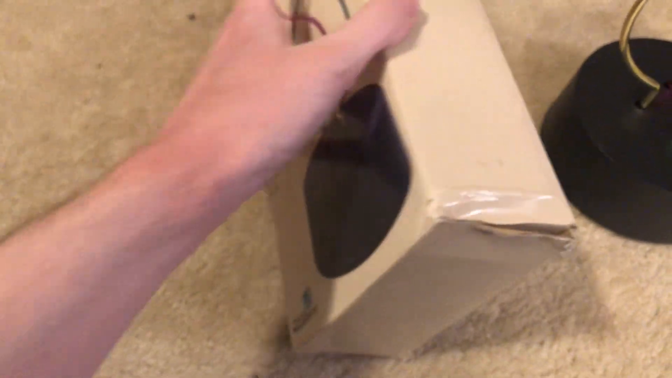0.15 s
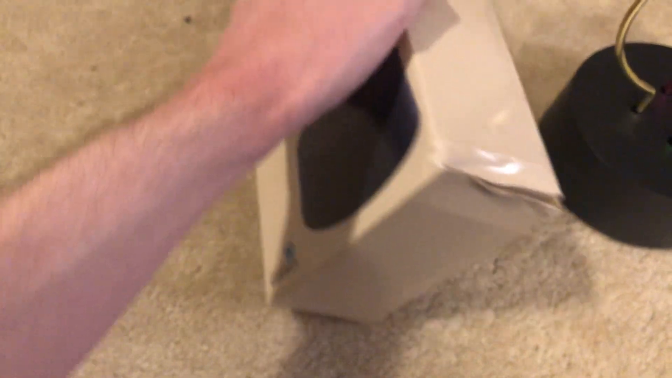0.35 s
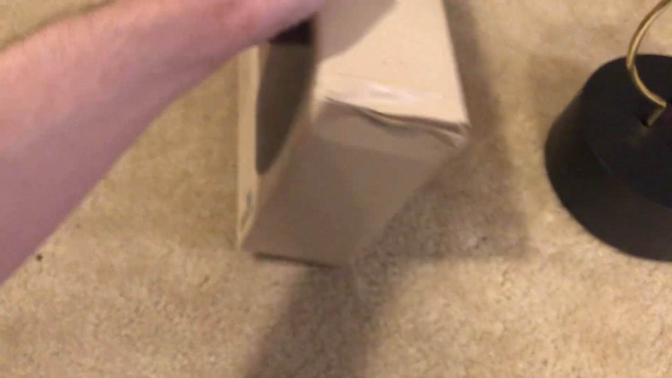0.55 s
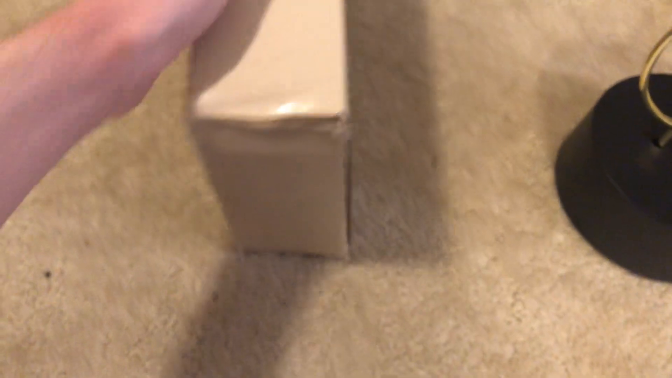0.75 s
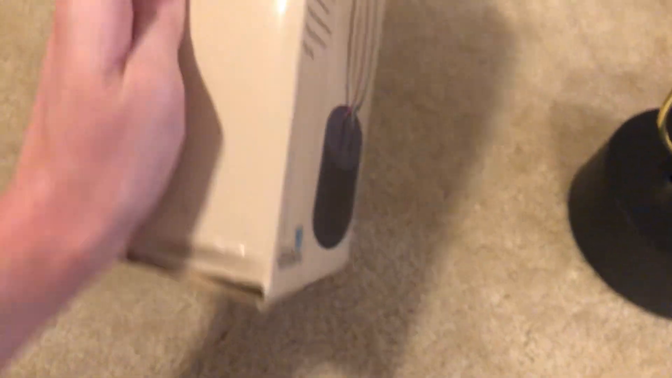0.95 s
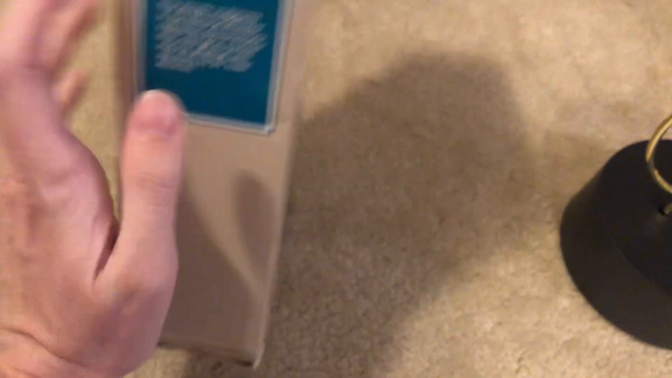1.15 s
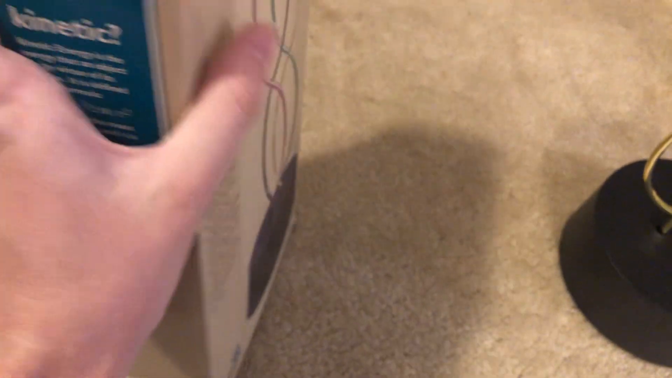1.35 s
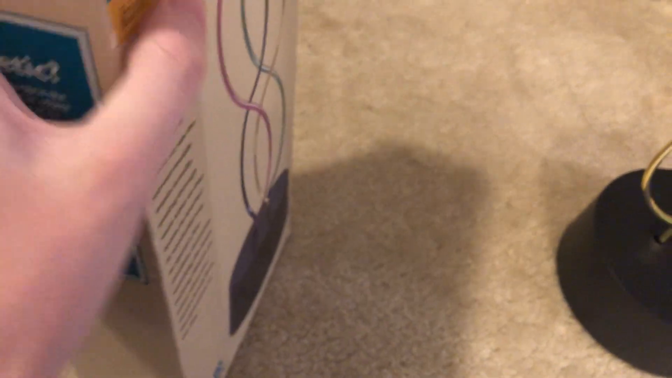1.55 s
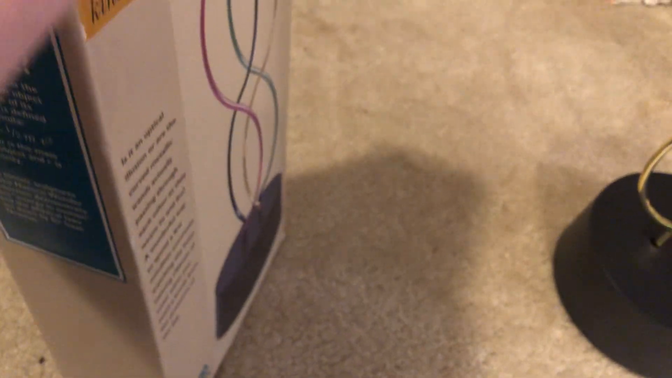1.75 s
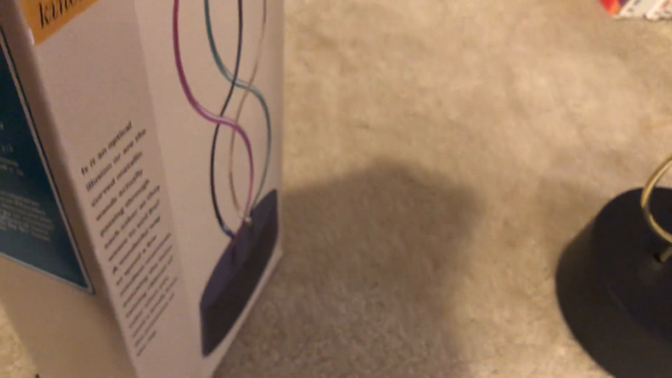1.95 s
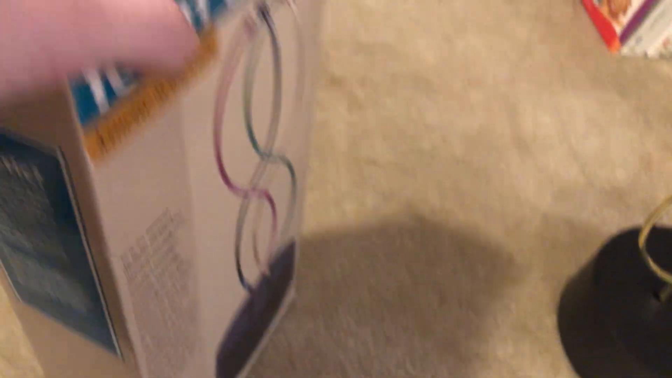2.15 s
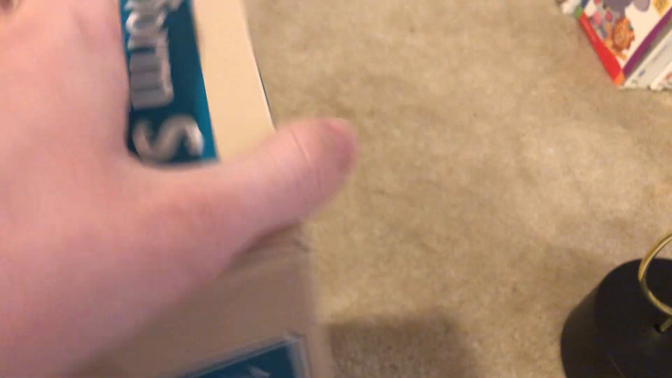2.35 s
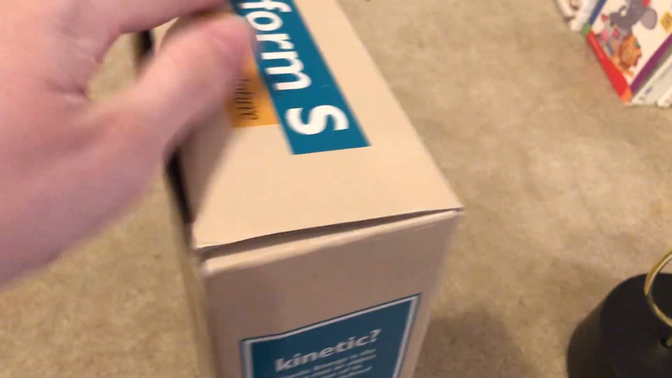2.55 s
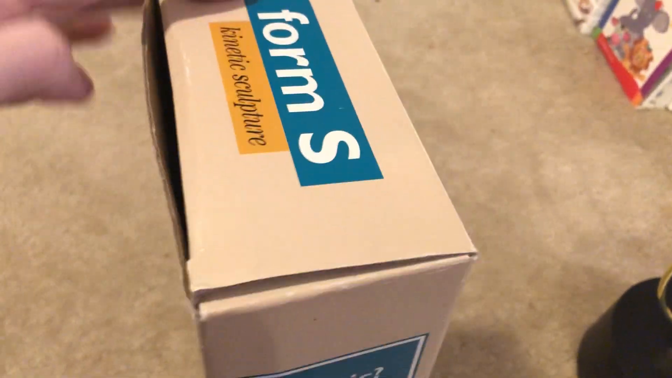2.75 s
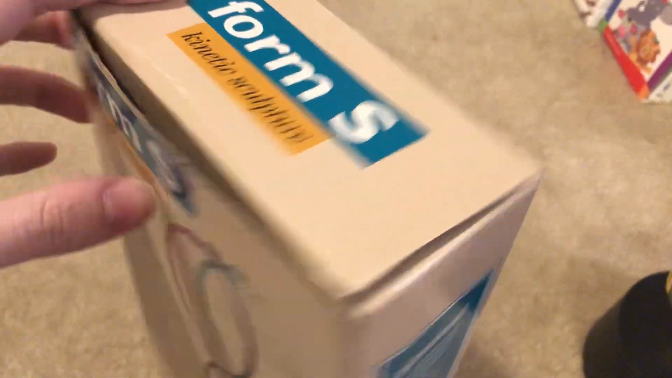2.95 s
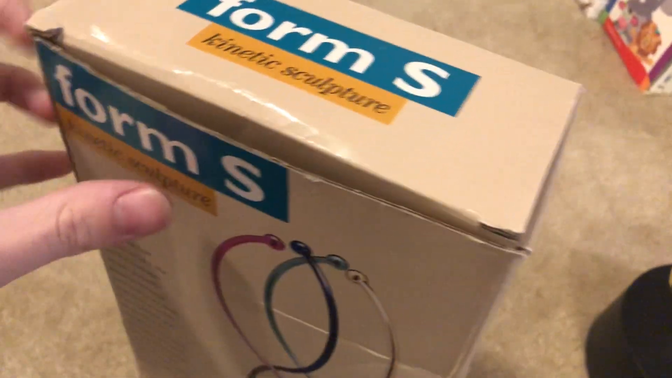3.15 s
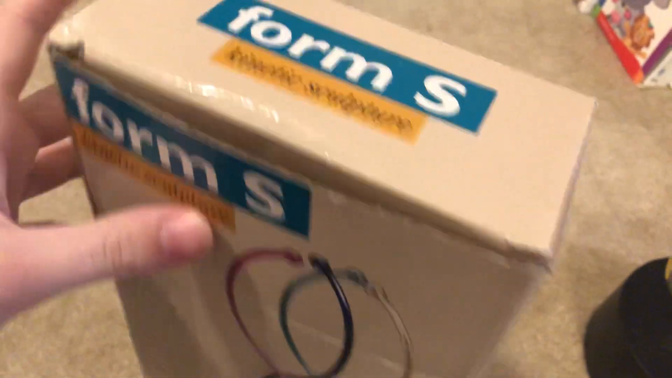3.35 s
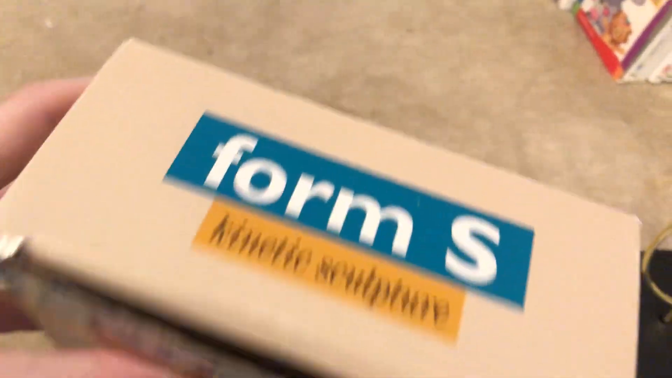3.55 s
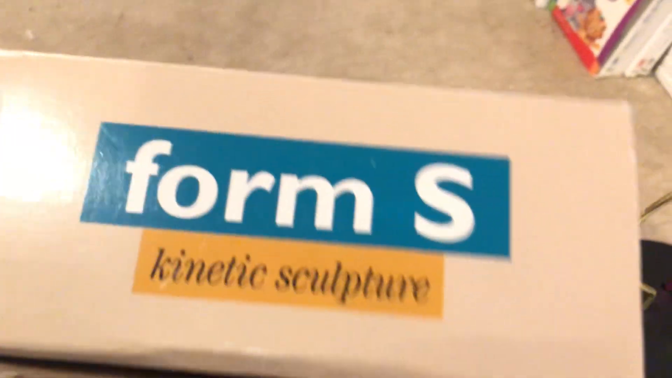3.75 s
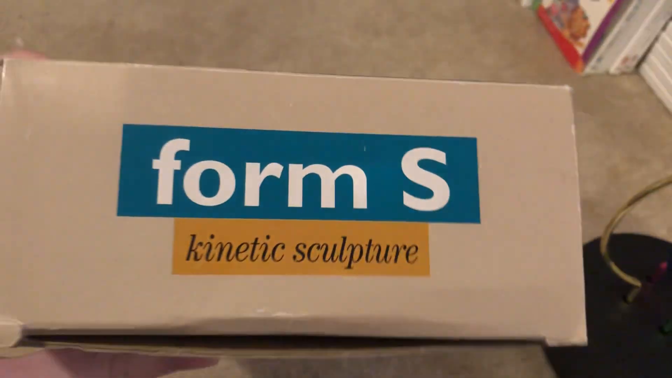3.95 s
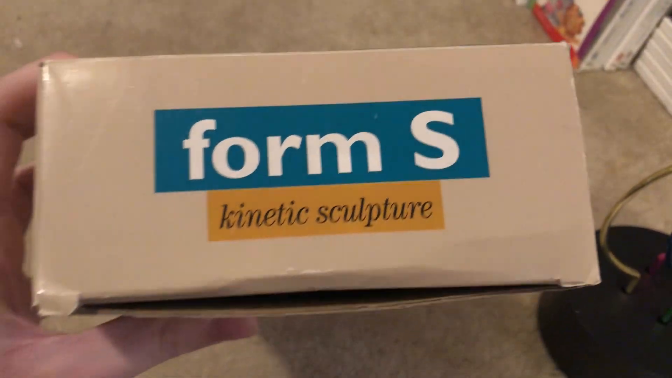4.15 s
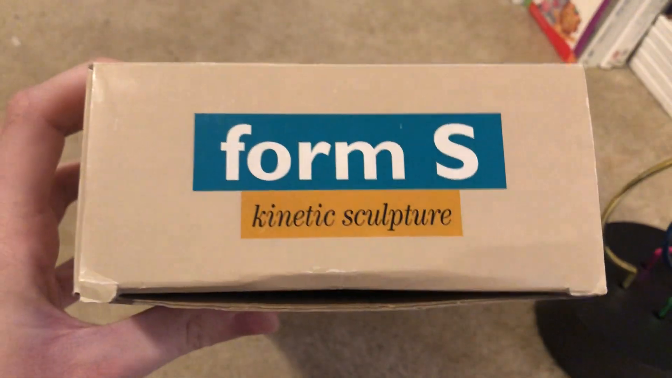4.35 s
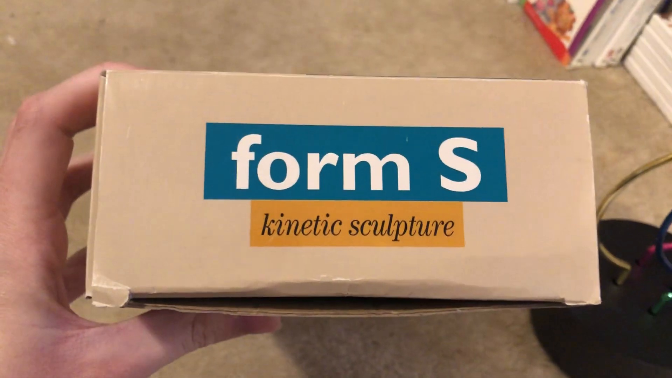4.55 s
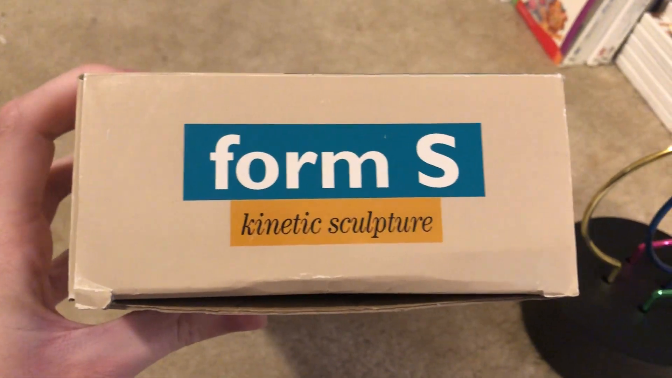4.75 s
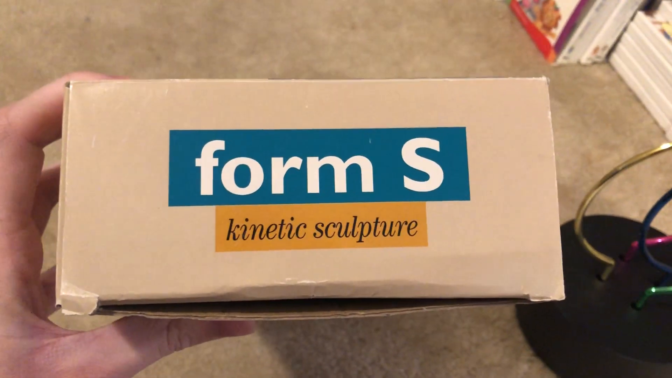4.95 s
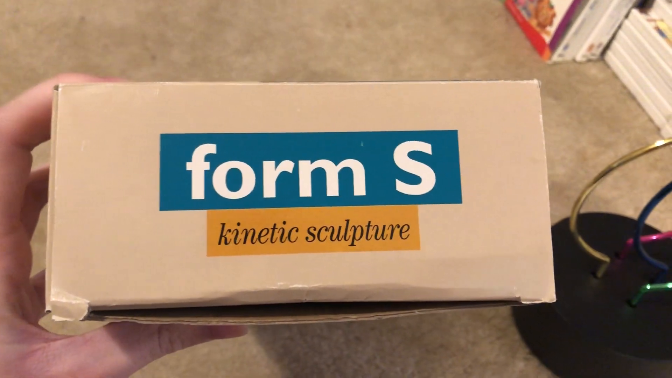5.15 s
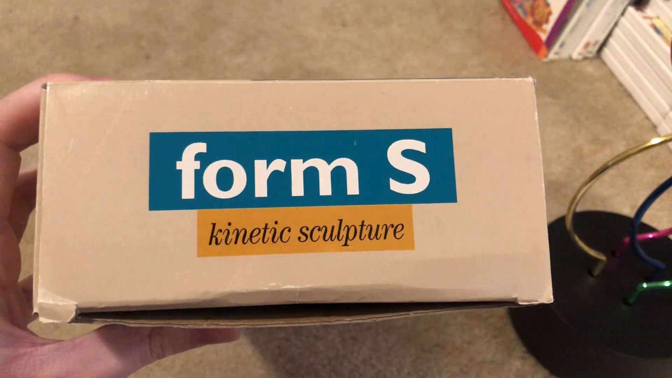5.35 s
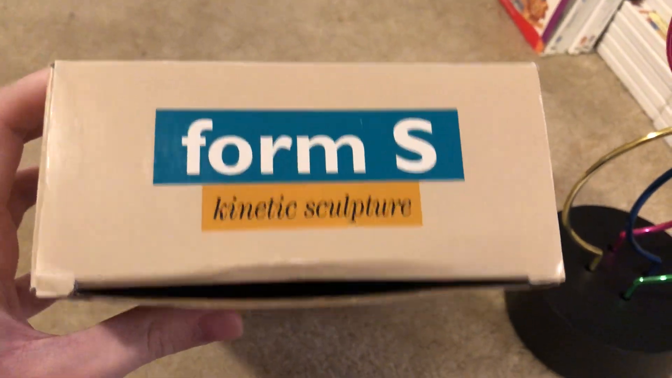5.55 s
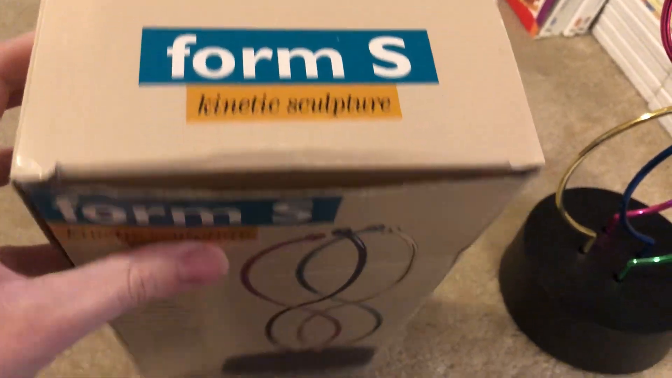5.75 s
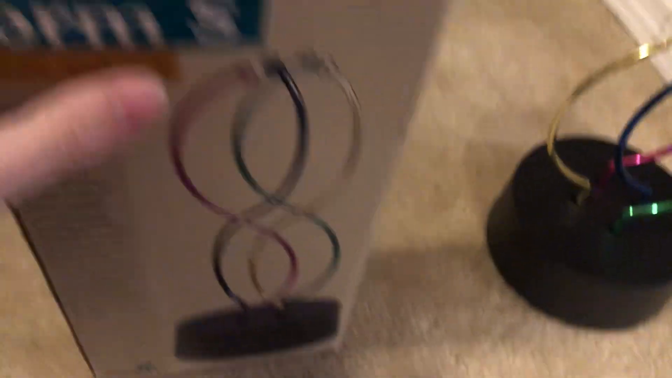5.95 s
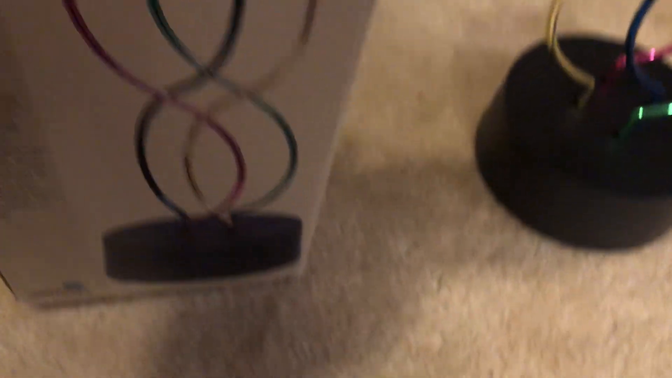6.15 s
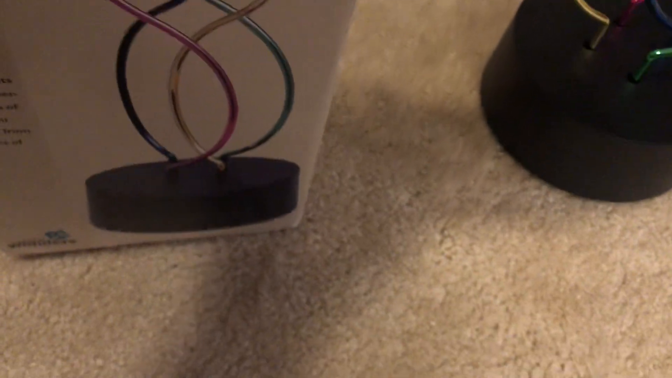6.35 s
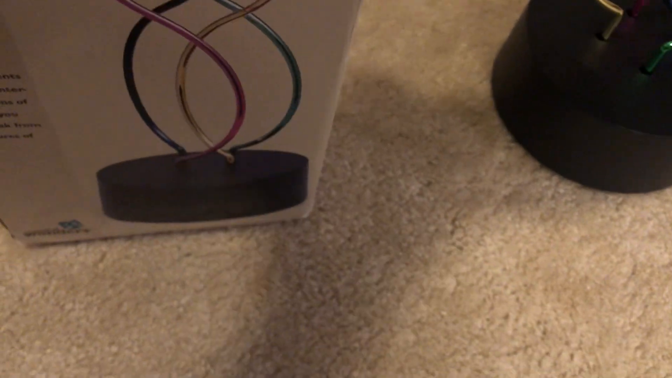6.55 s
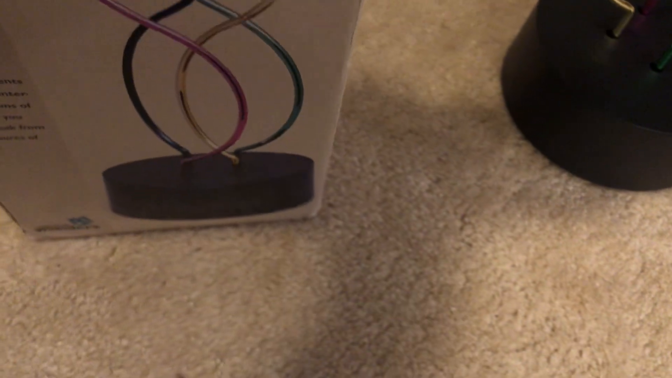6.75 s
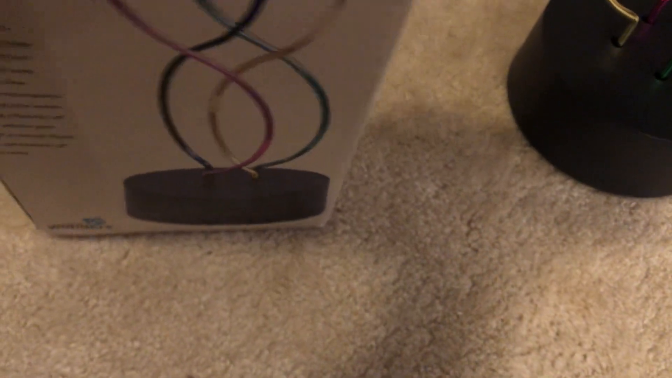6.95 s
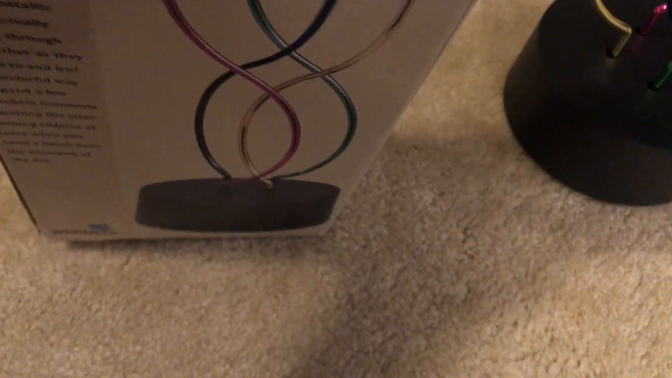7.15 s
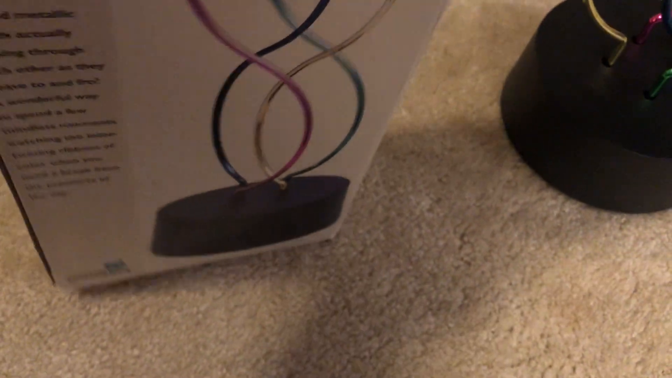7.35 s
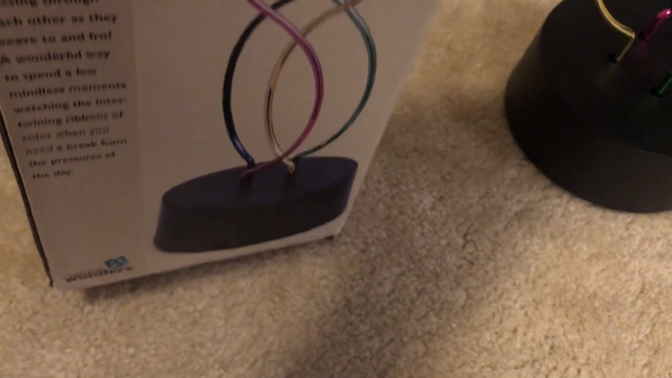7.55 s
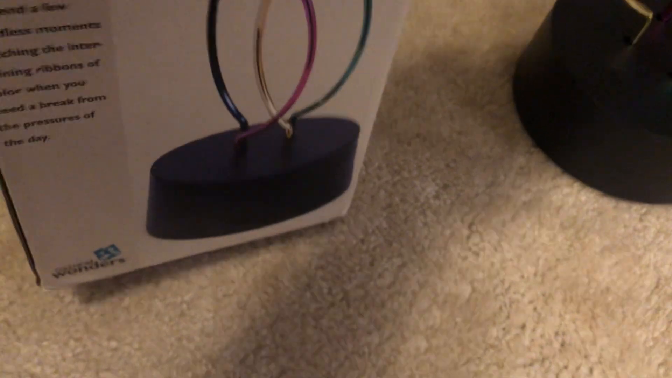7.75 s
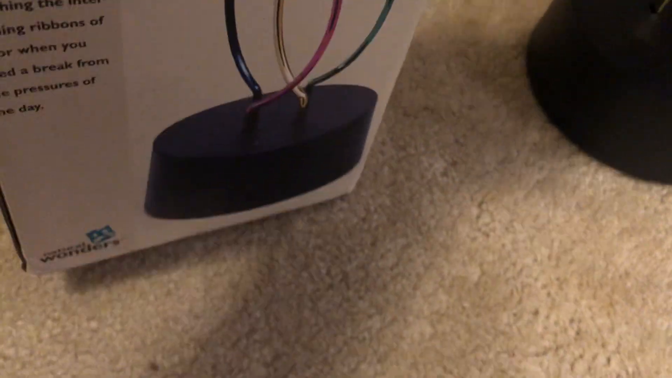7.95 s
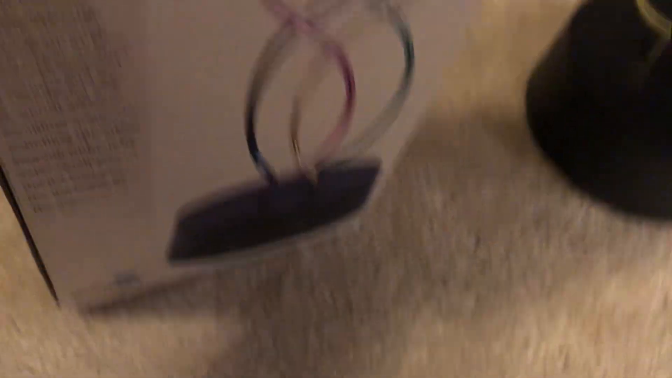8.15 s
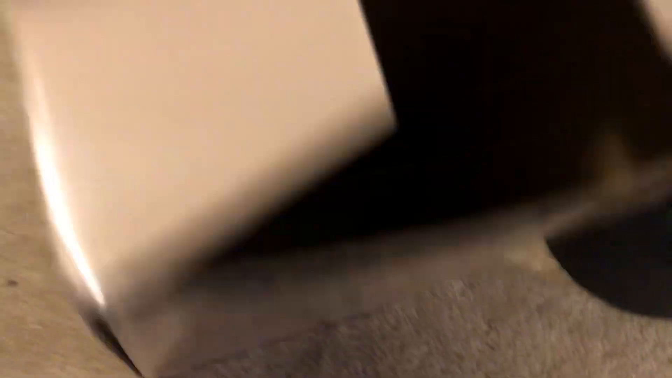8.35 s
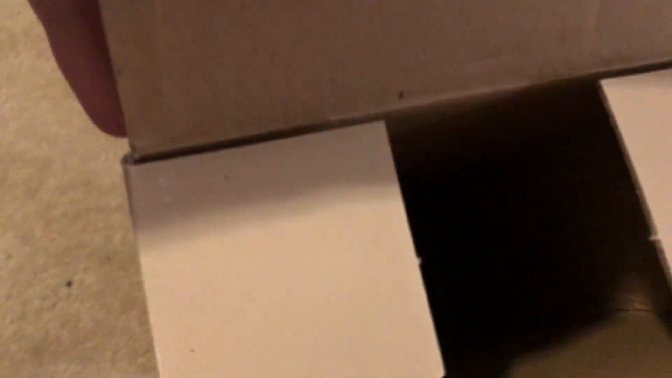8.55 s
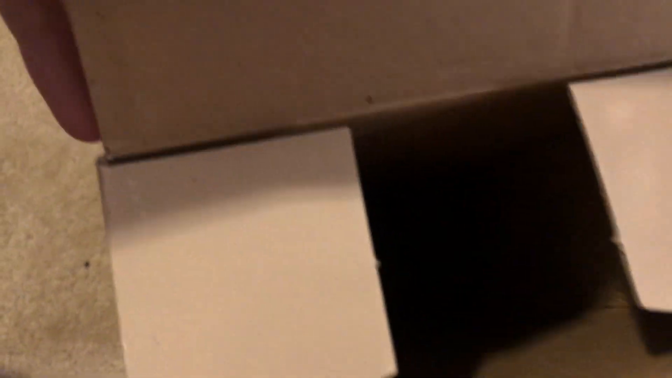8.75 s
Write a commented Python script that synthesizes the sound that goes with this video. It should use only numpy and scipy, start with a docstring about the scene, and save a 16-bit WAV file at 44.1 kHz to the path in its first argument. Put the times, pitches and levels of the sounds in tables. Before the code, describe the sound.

An empty cardboard carton is handled close to a phone in a quiet carpeted room. Soft rasping slides lead into a cluster of hollow bumps and papery ticks, then scattered scrapes and knocks. A pause leaves only low ventilation hum and faint hiss. Rubbing resumes, building to one loud, sharp cardboard clack, then fading into light scrapes.

```python
"""Cardboard box dragged over carpet

An empty box is tipped, turned and slid by hand, close to a phone in a quiet room.
Flicks of random noise make the rasp of skin and carpet fibres, and shake panel resonances into a rumble.
Decaying sines make the knocks, short noise bursts the cracks, narrow filtered noise the rings.
A short room tail follows the box; shaped noise lies under it as ventilation hum and hiss."""
import sys
import numpy as np
from scipy import signal
from scipy.fft import rfft, irfft
from scipy.io import wavfile
from scipy.ndimage import uniform_filter1d

SR = 44100
rng = np.random.default_rng(int(sys.argv[2]) if len(sys.argv) > 2 else 0)


def digitize_waveform(pressure):
    """Quantize a signal to 16-bit integers and store it at the path in sys.argv[1].

    Rows of a 2-D input are taken as channels; values are limited to [-1, 1].
    """
    field = np.atleast_2d(pressure).T
    bounded = np.clip(field, -1, 1)
    quanta = np.round(bounded * 32767).astype(np.int16)
    wavfile.write(sys.argv[1], SR, quanta)


N = 392049  # length in samples

# Colour of the fine sizzle. Each row: frequency in Hz, relative density in dB per Hz.
SIZZLE_COLOUR = [(7000, -21), (10000, -12.5), (13000, -4.5), (16000, -3.5)]


def rubbing():
    """Fibre flicks radiate directly as rasp and sizzle, and through the panels as rumble."""
    rasp_level, sizzle_level, panel_level = friction()
    sizzle_flicks = fibres(per_s=3000, spread_db=3.0, patchy_db=1.4)
    sizzle = colour(sizzle_flicks, SIZZLE_COLOUR, 10000, 17600)
    direct = rasp_level * rasp(spread_db=2.5) + sizzle_level * sizzle
    return direct + undb(-2.5) * panel_level * rumble()


# Faint rubbing while the hand is on the moving box. Each row: time in seconds, rasp level in dB.
HOLDING = [(0, -82.5), (0.8, -77), (1.1, -77.5), (2.4, -81), (3.2, -85), (3.3, -77), (3.63, -79),
           (4.0, -96), (5.75, -102), (5.9, -77), (6.4, -89), (7.5, -85), (8.5, -78), (8.89, -80)]
HOLDING_SIZZLE_DB, HOLDING_PANEL_DB = -2.5, 9  # drive relative to its rasp
# Slides over carpet and skin. Each row: start in seconds, attack, hold and release in ms, rasp level in dB,
# drift over the hold in dB, then sizzle and panel drive in dB relative to the rasp.
SLIDES = [(0.08, 223, 270, 160, -61.5, -2, -0.5, 10), (0.85, 59, 26, 35, -62, 1, -9, 7.5),
          (1.12, 79, 4, 25, -60.5, -5, -3, 12.5), (1.27, 50, 28, 40, -63.5, -2.5, 2, 15),
          (1.34, 30, 75, 30, -75, 1, -1, 14), (1.43, 40, 52, 40, -68, -1, 4, 0),
          (1.47, 96, 47, 33, -65, -4, 10.5, -2), (1.62, 25, 104, 110, -66.5, -2, 3, 10.5),
          (1.76, 40, 50, 30, -75, -2, -4, 16), (1.88, 19, 74, 320, -70, -6, -1, 16),
          (2.08, 37, 130, 34, -74, 1, -3, 10.5), (2.23, 36, 178, 37, -66.5, -3, -3, 10.5),
          (2.49, 94, 123, 17, -80, 7, 7, 18), (2.56, 160, 4, 52, -73, -1, -4, 3),
          (2.7, 200, 20, 12, -72, 1, -8, 17.5), (2.875, 72, 140, 70, -61, -1, 1, 10),
          (3.335, 27, 220, 70, -69.5, -3, 1, 2), (5.79, 60, 234, 60, -74, -6, -3, 10.5),
          (6.07, 45, 4, 72, -71, -6, 2.5, 7), (6.195, 14.4, 26.5, 15, -66, 5, -3, 9),
          (6.36, 40, 4, 34, -69, -1, -6, -3), (6.41, 98, 266, 100, -69, 0, -3, 11),
          (6.79, 44, 83, 33, -73, 5, -2, 8.5), (6.93, 63, 3.3, 30, -55.5, -1.5, -3, 12.5),
          (7.04, 43, 3, 27, -57.5, 0, 1, 8), (7.06, 240, 10, 150, -67.5, -1, 2, 15.5),
          (7.31, 42, 46, 86, -68.5, 4.5, 0, 16.5), (7.42, 190, 56, 50, -65.5, -3, 1, 14),
          (7.66, 39, 5, 20, -67, 0, 0, 18), (7.772, 3, 12, 90, -59, -5, -4, 17),
          (7.86, 73, 80, 50, -76, -10, 2, 12), (7.96, 201, 40, 140, -67.5, -3, 1, 15),
          (8.2, 86, 120, 60, -65, -4.5, 2, 6), (8.73, 84, 3, 23, -57.5, -4, 0, 1.5),
          (8.83, 60, 10, 10, -68, -1, -6, -6)]
EDGE_DB = -20  # how far under its level a slide starts and ends
# Short slips of a finger or an edge. Each row: start in seconds, rasp level in dB (the peak is 3 dB above),
# length in ms, share of the length to the peak, then sizzle and panel drive in dB relative to the rasp.
SLIPS = [(0.664, -67, 41, 0.88, -6.5, 10), (1.1, -75, 20, 0.7, -8, 10), (1.152, -62.5, 36, 0.35, -2, 9),
         (1.19, -62, 15, 0.47, -6, 16), (1.238, -72.5, 25, 0.49, -2, 20), (1.29, -73, 14, 0.2, 0, 10),
         (1.312, -65, 35, 0.15, 5, 14), (1.46, -75, 64, 0.23, 3, 0), (1.637, -65, 28, 0.27, -1, 11.5),
         (1.725, -62.5, 22, 0.6, -2, 5), (1.79, -83.5, 16, 0.29, -12, 12),
         (1.819, -76.5, 54, 0.58, 3, 17.5), (1.889, -74, 36, 0.3, -6, 9), (1.93, -69, 16, 0.4, -8, 6),
         (2.252, -69, 29, 0.53, -5.0, 11), (2.381, -62.5, 29, 0.12, -6, 8.5),
         (2.527, -64.5, 31, 0.46, -3, 7.5), (2.646, -61, 10, 0.2, 5, 1), (2.666, -58.5, 24, 0.64, 7, 14),
         (3.022, -61.5, 32, 0.5, 0, 13), (3.353, -66, 27, 0.21, -6, 15.5), (3.402, -65, 31, 0.38, 0.5, 5),
         (3.522, -65, 20, 0.5, 3, 13), (3.577, -65, 40, 0.2, -8, 4), (3.899, -72, 19, 0.98, -6.0, -2),
         (5.612, -72.5, 16, 0.71, -1, 9), (5.824, -67, 39, 0.33, 2, 1), (5.908, -64.5, 36, 0.19, -8, 4),
         (6.03, -74, 25, 0.4, 1, 4), (6.093, -70.5, 44, 0.66, -1, 13), (6.39, -73.5, 40, 0.36, -5, 11.5),
         (6.531, -79, 30, 0.32, 7, 3), (6.716, -67, 15, 0.35, -3, 12.5), (6.736, -66.5, 13, 0.54, 12.5, 13),
         (6.799, -62, 13, 0.55, -20, 7), (6.974, -60, 74, 0.22, -1, 8),
         (7.043, -67.5, 16, 0.47, -5.0, 14.5), (7.065, -64.5, 55, 0.65, -5, 16.5),
         (7.222, -71.5, 28, 0.23, -9, 17.5), (7.334, -63, 93, 0.21, 4, 14.5),
         (7.384, -65, 63, 0.12, 4.5, 17.5), (7.567, -63.5, 48, 0.15, -2, 12),
         (7.627, -64.5, 59, 0.26, -4, 17.5), (7.708, -54, 25, 0.64, 0, 10.5),
         (7.722, -45.5, 26, 0.5, -1, 10.5), (7.737, -43.5, 27.4, 0.53, -1, 7.5),
         (7.76, -49, 24, 0.6, 5, 10), (7.781, -57.5, 13, 0.36, -15, 23.5), (7.803, -72, 9.8, 0.65, -9.0, 8),
         (7.864, -74, 37, 0.35, -11, 25.5), (8.252, -71, 6.3, 0.47, -21, 26.5), (8.3, -73, 23, 0.5, 4, 4),
         (8.485, -77.5, 34, 0.4, 2, 4), (8.695, -79, 30, 0.5, -1, -4), (8.775, -77, 58, 0.7, -7, -5),
         (8.865, -71, 19, 0.4, -1, 4)]


def friction():
    """Strength in time of rasp, sizzle and panel drive, summed in power over holding, slides and slips."""
    def layer_power(rasp_db, sizzle_db, panel_db):
        return undb(2 * (rasp_db + np.array([[0], [sizzle_db], [panel_db]])))

    t = np.arange(N) / SR
    holding_db = np.interp(t, *np.transpose(HOLDING))
    power = layer_power(holding_db, HOLDING_SIZZLE_DB, HOLDING_PANEL_DB)

    for start, attack_ms, hold_ms, release_ms, db, drift_db, sizzle_db, panel_db in SLIDES:
        corners = start + np.cumsum([0, attack_ms, hold_ms, release_ms]) / 1000
        on = slice(int(start * SR), int(corners[-1] * SR))
        contour_db = np.interp(t[on], corners, [EDGE_DB, 0, drift_db, drift_db + EDGE_DB])
        power[:, on] += layer_power(db + contour_db, sizzle_db, panel_db)
    power = uniform_filter1d(power, size=441)  # 10 ms of smoothing

    for start, db, ms, rise, sizzle_db, panel_db in SLIPS:
        u = np.linspace(0, 1, int(ms * SR / 1000))
        rise = np.clip(rise, .05, .95)
        # the grip builds up to the peak and dies away after it
        shape = np.sin(np.pi / 2 * np.minimum(u / rise, (1 - u) / (1 - rise))) ** 2
        stretch = power[:, int(start * SR):int(start * SR) + len(u)]
        stretch += 2 * layer_power(db, sizzle_db, panel_db) * shape[:stretch.shape[1]]
    return np.sqrt(np.maximum(power, 0))


# Ridges that catch: mean rate per second, mean jump in gain, fade time constant in ms.
CATCH_PER_S, CATCH_GAIN, CATCH_MS = 45, 0.42, 5.8


def fibres(per_s, spread_db, patchy_db):
    """Fibres that catch and let go: dense flicks of uneven size over a hiss, the grip wavering."""
    struck = rng.random(N) < per_s / SR
    size = undb(spread_db * np.minimum(rng.exponential(size=N), 4.0))
    flicks = struck * size * rng.standard_normal(N)
    # now and then a ridge catches: the level jumps at once and fades
    catches = (rng.random(N) < CATCH_PER_S / SR) * rng.exponential(size=N) * CATCH_GAIN
    grip = 1 + signal.lfilter([1], [1, -np.exp(-1000 / CATCH_MS / SR)], catches)
    contact = flicks / flicks.std() + 1.09 * rng.standard_normal(N)
    return contact * undb(patchy_db * walk(70)) * grip / np.sqrt(np.mean(grip ** 2))


# High resonances of the corrugated card. Each row: frequency in Hz, width in Hz, relative level in dB.
CARD_RESONANCES = [(2300, 1500, 8.5), (3060, 1000, -4), (3750, 900, 2.5), (4520, 1000, 1),
                   (5180, 690, -1.5), (5960, 1600, 0.5), (6800, 870, -8.5), (2150, 180, -12),
                   (3150, 120, -7.5), (4420, 200, -7), (5730, 250, -9.5), (7560, 1400, -6),
                   (8900, 1000, -4.5), (11600, 2100, -13)]


def rasp(spread_db):
    """Flicks ring the card's high resonances, which come and go as the contact moves."""
    flicks = fibres(per_s=4900, spread_db=2.0, patchy_db=1.5)
    out = undb(-19) * flicks
    for hz, width_hz, db in CARD_RESONANCES:
        band = signal.lfilter(*signal.iirpeak(hz, hz / width_hz, fs=SR), flicks)
        gain = undb(db + spread_db * walk(18))
        out = out + gain * band / band.std() * flicks.std() / 4
    return colour(out, [(600, -24), (1700, 0), (11000, 0), (16000, -8)], 2500, 9000)


# Panel and cavity modes of the box, also rung by the knocks. Each row: frequency in Hz, relative level in dB,
# 60 dB decay in seconds before damping or grip.
BOX_MODES = [(67.4, -9, 0.15), (97.3, -3, 0.3), (140, 7, 0.076), (220.6, 4.5, 0.086), (302, 2, 0.056),
             (366, -1.5, 0.029), (490, -3, 0.066), (563.5, -2.5, 0.055), (690, 2.5, 0.035),
             (809.5, -1.5, 0.043), (898, 0, 0.028), (990, -5, 0.03), (1133, 2.5, 0.013), (1273, 4.5, 0.033),
             (1400, 4, 0.032), (1660, -3, 0.037), (2146, -6, 0.036)]
# The panel that faces the phone changes as the box turns.
# Each row: time in seconds, loudest rumble in octaves above 100 Hz.
FACING = [(0, 1.1), (0.7, 2), (1.2, 1.6), (1.7, 2.3), (2, 2), (2.68, 2.17), (3.5, 2.23), (5.9, 3.2),
          (6.5, 2.35), (7.0, 2.3), (7.6, 2.35), (7.75, 2.56), (7.88, 2.3), (8.3, 2.26), (8.65, 1.6),
          (8.8, 2.6)]
# Papery skirt of dense, weak modes. Each row: frequency in Hz, relative density in dB per Hz.
SKIRT_COLOUR = [(300, -20), (1200, 1), (2200, -5.5), (4000, -12.5), (8000, -28)]
SKIRT_DB = -14  # relative to the summed modes
GRIP_DAMPING, BEND = 1.73, 0.03  # rubbed modes ring shorter and their pitch wanders by this share
RUB_TILT_DB = -5.5  # per octave above 900 Hz: rubbing drives the top panel modes less
MUFFLE_DB = 4.5  # spread of a rubbed mode's level


def rumble():
    """Fibre flicks shake the panel modes; those near the facing panel's pitch come out loudest."""
    force = fibres(per_s=1500, spread_db=2.0, patchy_db=2.5)
    facing = np.interp(np.arange(N) / SR, *np.transpose(FACING))
    out, power = 0, 0
    for hz, db, t60 in BOX_MODES:
        q = np.pi * hz * t60 / GRIP_DAMPING / np.log(1000)
        mode = signal.lfilter(*signal.iirpeak(hz, q, fs=SR), force)
        # reading at an uneven pace bends the pitch
        mode = np.interp(np.cumsum(1 + BEND * walk(9)), np.arange(N), mode)
        # the hand's grip shifts, so each mode is freer or more muffled from moment to moment
        tilt_db = RUB_TILT_DB * max(np.log2(hz / 900), 0)
        gain = undb(db + tilt_db + MUFFLE_DB * walk(24))
        gain = gain * (focus(np.log2(hz / 100), facing, 1.0) + 0.3)
        out = out + gain * mode / mode.std()
        power = power + gain ** 2
    return out / np.sqrt(power) + undb(SKIRT_DB) * colour(force, SKIRT_COLOUR)


def focus(octave, centre, spread):
    """Gain of a mode that lies some octaves from the favoured pitch."""
    return np.exp(-.5 * ((octave - centre) / spread) ** 2)


# Knocks on the panels and low thuds on the carpet. Each row: start in seconds, peak in dB, favoured pitch in
# Hz, spread of modes in octaves, decay speed of the modes (1 keeps their own decay time).
KNOCKS = [(1.118, -40.5, 341, 0.45, 1.36), (1.167, -46.5, 470, 0.15, 0.63), (1.198, -33, 430, 0.72, 0.89),
          (1.292, -47, 240, 0.45, 0.65), (1.295, -47, 950, 0.16, 1.1), (1.312, -40, 300, 0.5, 1.2),
          (1.326, -30.5, 378, 0.68, 1.06), (1.341, -34.5, 282, 0.47, 1.1), (1.35, -43, 140, 0.35, 0.8),
          (1.418, -39, 700, 0.42, 0.94), (1.422, -34.5, 189, 0.49, 1.06), (1.66, -39.5, 303, 0.6, 1),
          (1.738, -41.5, 1400, 0.45, 1.15), (1.739, -43, 302, 0.44, 1.2), (1.751, -46.5, 230, 0.37, 0.49),
          (1.796, -46, 700, 0.41, 0.83), (1.919, -45, 248, 0.88, 1.1), (2.014, -45.5, 250, 0.59, 1.7),
          (2.262, -44.5, 564, 1.2, 0.77), (2.416, -42, 354, 1, 1.1), (2.548, -44, 240, 0.7, 0.92),
          (2.647, -44.5, 535, 0.28, 0.94), (2.669, -34.5, 525, 0.35, 0.81), (2.677, -35, 536, 0.34, 1.4),
          (2.878, -28.5, 406, 0.67, 1.02), (3.025, -47, 300, 0.46, 1), (3.036, -40, 875, 0.31, 0.74),
          (3.064, -43.5, 641, 0.25, 0.65), (3.358, -47, 366, 0.84, 0.58), (3.53, -45, 400, 0.98, 1),
          (3.536, -35, 247, 1.2, 1.04), (5.616, -64, 342, 0.7, 1.1), (5.912, -49.5, 317, 1.2, 0.6),
          (6.23, -52, 239, 0.94, 0.77), (6.395, -54, 342, 0.38, 0.58), (6.804, -54, 2190, 0.25, 1.14),
          (6.846, -45, 270, 1.1, 1.6), (6.848, -46.5, 940, 0.29, 0.73), (6.993, -38, 840, 1.1, 1.6),
          (7.078, -37.5, 1430, 0.36, 1.14), (7.094, -47, 685, 0.78, 0.85), (7.224, -43.5, 212, 0.38, 0.72),
          (7.239, -52, 690, 0.27, 0.99), (7.34, -42, 1320, 0.29, 0.92), (7.386, -38, 378, 0.68, 0.87),
          (7.391, -44, 80.4, 0.42, 1.3), (7.574, -43.5, 820, 0.43, 0.59), (7.634, -57, 408, 0.65, 1.1),
          (7.716, -46, 800, 0.6, 0.75), (7.731, -23.5, 650, 0.4, 1.6), (7.732, -34, 129, 0.39, 1.2),
          (7.738, -30, 920, 0.13, 0.72), (7.753, -26.5, 2200, 0.2, 1.25), (7.761, -28, 713, 0.44, 0.61),
          (7.771, -21.5, 863, 0.37, 0.9), (7.774, -30.5, 311, 0.23, 0.76), (7.777, -32, 56, 0.33, 2.1),
          (7.785, -32, 1960, 0.25, 1.5), (7.787, -33, 855, 0.22, 1.1), (7.795, -31.5, 102.6, 0.9, 0.99),
          (7.807, -36.5, 241, 0.65, 0.84), (7.808, -37, 1990, 0.23, 1.25), (7.809, -39, 900, 0.24, 1.2),
          (7.819, -30, 223.5, 0.59, 0.8), (7.841, -40.5, 99.6, 1.2, 0.96), (7.869, -55, 242, 0.7, 1.5),
          (7.884, -48, 675, 0.73, 1.7), (8.252, -44.5, 1480, 0.56, 1.35)]
LAG_CYCLES = 2.16  # how late the modes under the favoured pitch set in, so that a knock settles downward


def knocks():
    """Each blow rings the modes around its favoured pitch; slow bending waves arrive late, so lows swell in."""
    out, t = np.zeros(N + SR), np.arange(SR // 4) / SR
    hz, mode_db, t60 = np.transpose(BOX_MODES)[:, :, None]
    for start, db, pitch_hz, spread, decay_speed in KNOCKS:
        gain = undb(mode_db) * focus(np.log2(hz), np.log2(pitch_hz), max(spread, .15))
        # the exponent grows with pitch: the high modes are affected most
        muffle = decay_speed ** (0.69 * np.log2(hz / 50))
        lag = LAG_CYCLES * np.clip(1 / hz - 1 / pitch_hz, 0, 0.012)
        late = np.maximum(t - lag, 0)
        swell = 1 - np.exp(-late * hz / 0.32)
        decay = np.exp(-np.log(1000) * muffle * late / t60)
        sound = np.sum(gain * swell * np.sin(2 * np.pi * hz * late) * decay, axis=0)
        out[int(start * SR):int(start * SR) + len(t)] += undb(db) * sound / abs(sound).max()
    return out[:N]


# Sharp cracks of flaps and tape. Each row: start in seconds, peak of the low band near 2 kHz in dB,
# energy around 6 kHz and around 12 kHz in dB relative to the low band, low-band decay constant in ms.
CRACKS = [(1.1165, -54, -12, -14, 1.5), (1.1583, -50, -7, -10, 1.9), (1.196, -38.5, -26, -20, 1.2),
          (1.293, -53, -3, -4, 2.5), (1.315, -38.5, -19, -14, 1.5), (1.3255, -49, -11, -12, 1.5),
          (1.4174, -40.5, -12, -22, 2.8), (1.4726, -53, 3, -6, 1.5), (1.64, -56, -8.5, -6.5, 1.5),
          (1.738, -43, -6, -15, 1.4), (1.796, -51, -21, -16, 1.9), (1.9364, -64, -8, -9, 1.5),
          (2.259, -51, -12, -15, 1.7), (2.3833, -47, -4, -12, 1.5), (2.531, -44.5, -9, -14, 1.2),
          (2.648, -48, -9, -10, 2.5), (2.67, -36, -8, -13, 2.3), (2.676, -39, -15, 2, 1.7),
          (2.8759, -39, -4.5, -6, 5.3), (3.036, -43, -7, -6, 1.5), (3.3578, -43, -1, -17, 1),
          (3.4094, -60, -7, -6, 1.5), (3.527, -52, 7, -9, 1.5), (3.5885, -50.5, 6, -16, 1.9),
          (3.9085, -72, -6, -8, 1.5), (5.62, -51, -12, -10, 1.4), (5.833, -61, -9, -9, 1.3),
          (5.912, -48.5, -7, 3.5, 1.5), (6.209, -61, -12, -13, 1.5), (6.6624, -63, -15.5, -17, 1.5),
          (6.6984, -56, -18.5, -11.5, 1.25), (6.719, -48.5, -15, -6, 1.5), (6.7383, -47, -8, -1, 1.5),
          (6.803, -39.5, -19, -24, 3.6), (6.8483, -43, -8, -20, 2.4), (6.99, -39, -14, -14, 1.7),
          (7.0768, -54, -13, -15, 1.3), (7.337, -49, -17, -15.5, 1.4), (7.3854, -55, -12, -7, 1.7),
          (7.577, -48, -13, -10, 1.5), (7.6246, -49, -17, -27, 1.5), (7.715, -46, -16, -14, 1.5),
          (7.7245, -41, -11, -11, 1.5), (7.7332, -38, -8, -14, 2), (7.7533, -24.5, 1.5, -3, 3.6),
          (7.771, -17, -4, -3, 2.3), (7.7845, -38, -6, -20, 2), (7.787, -40, -10, -24, 1.5),
          (7.8095, -38, -17, -25, 1.6), (8.2518, -46, -19.5, -30, 1.8), (8.78, -50, 4.5, -19, 1.9)]


def cracks():
    """Bursts a few milliseconds long, sharp in front; the treble dies first."""
    out, t = np.zeros(N + SR), np.arange(1024) / SR
    edges_hz = ((900, 2800), (3200, 9000), (9000, 16000))
    bands = [signal.butter(2, edges, "band", fs=SR, output="sos") for edges in edges_hz]
    noises = rng.standard_normal((len(CRACKS), 1024))
    for (start, db, mid_db, top_db, ms), noise in zip(CRACKS, noises):
        snap = noise + 7.6 * (t == 0)  # the fibres part with one sharp step, then crumble on
        low, mid, top = (signal.sosfilt(band, snap * np.exp(-1000 * faster * t / ms))
                         for band, faster in zip(bands, (1, 2.5, 3.5)))
        burst = low / low.std() + undb(mid_db) * mid / mid.std() + undb(top_db) * top / top.std()
        level = undb(db) * low.std() / abs(low).max()
        out[int(start * SR):int(start * SR) + 1024] += level * burst
    return out[:N]


# Brief rings of one resonance while an edge drags.
# Each row: start in seconds, length in ms, pitch in Hz, level in dB before the swell and fade.
RINGS = [(1.52, 50, 4630, -76), (1.7, 50, 895, -57), (1.7, 25, 2900, -69), (1.705, 44, 1500, -68),
         (1.78, 29.5, 790, -54), (1.795, 24, 2400, -68), (1.89, 49, 1460, -69), (2.679, 11.6, 2560, -52.5),
         (2.7, 21, 1290, -62), (2.935, 20, 3800, -64), (2.96, 17, 2600, -62), (2.98, 18, 3880, -65),
         (2.99, 24, 1840, -62), (3.032, 16, 6000, -58), (3.07, 18, 3200, -62), (6.505, 27, 2100, -69),
         (6.55, 16, 1350, -65), (6.803, 18, 2300, -62), (6.88, 28, 1300, -63), (3.03, 57, 1330, -54.5),
         (3.04, 49, 800, -55), (6.718, 31, 3070, -70), (6.719, 31, 4420, -66), (6.85, 93, 4400, -70),
         (6.99, 41, 3100, -69), (7.07, 34, 3130, -67), (7.074, 32, 4030, -58.5), (7.33, 43, 4420, -62),
         (7.341, 23, 1320, -54), (7.385, 35, 4500, -60), (7.225, 80, 4100, -74), (7.23, 28, 730, -56),
         (7.58, 35, 2200, -68), (7.63, 37, 2480, -62), (7.7, 28, 950, -51), (7.712, 12, 2000, -54),
         (7.738, 24, 940, -39), (7.764, 14, 9400, -40), (7.774, 12, 2000, -44), (7.774, 18, 856, -36),
         (7.728, 35, 2850, -48), (7.741, 35, 4470, -49), (7.76, 25, 2090, -40), (7.87, 29, 2000, -59),
         (8.265, 91, 4550, -69), (8.269, 20, 3200, -68), (8.29, 39, 2100, -64), (8.754, 75, 1890, -63.5),
         (8.36, 53, 2250, -68)]
RING_WIDTH = 0.048  # share of the pitch


def rings():
    """Friction noise through one narrow resonance, swelling and fading."""
    out = np.zeros(N)
    noises = rng.standard_normal((len(RINGS), 8192))
    for (start, ms, hz, db), noise in zip(RINGS, noises):
        ring = signal.lfilter(*signal.iirpeak(hz, 1 / RING_WIDTH, fs=SR), noise)
        ring = ring[-int(ms * SR / 1000):]  # the end, where the resonance is in full swing
        swell = np.sqrt(np.hanning(len(ring)))
        out[int(start * SR):int(start * SR) + len(ring)] += undb(db) * ring / ring.std() * swell
    return out


# Colour of the room hum and hiss. Each row: frequency in Hz, relative density in dB per Hz.
HUM_COLOUR = [(25, -14), (49, -9.5), (66, 0.5), (110, -6.5), (155, -1.5), (225, -14), (380, -15.5),
              (600, -24.5), (820, -25), (1000, -29.5), (2000, -33.5), (2450, -33.5), (2800, -32),
              (3050, -37.5), (3600, -41), (8000, -48.5), (16000, -49.5)]
HUM_DB = -55  # level around which it swells


def hum():
    """Ventilation rumble and microphone hiss as one shaped noise, its level swelling a little."""
    noise = colour(rng.standard_normal(N), HUM_COLOUR)
    return undb(HUM_DB + 1.6 * walk(3.31)) * noise


def undb(db):
    """dB to gain."""
    return 10 ** (np.asarray(db) / 20)


def colour(x, points, lo_hz=1., hi_hz=SR):
    """Shapes the spectrum of x by (Hz, dB) points; rms 1 inside the band lo-hi."""
    hz = np.maximum(np.arange(N // 2 + 1) * SR / N, 1.)
    at_hz, db = np.transpose(points)
    spectrum = rfft(x) * undb(np.interp(np.log(hz), np.log(at_hz), db))
    inside = (hz > lo_hz) & (hz < hi_hz)
    return irfft(spectrum, N) * N / np.sqrt(2 * np.sum(abs(spectrum[inside]) ** 2))


def walk(rate):
    """Random levels held 1 / rate s and slewed twice; spread near 1."""
    k = int(SR / rate)
    steps = np.repeat(rng.standard_normal(N // k + 1), k)
    return 1.08 * uniform_filter1d(uniform_filter1d(steps, k), k)[:N]


ROOM_T60_S, ROOM_DB = 0.36, -17  # 60 dB decay in seconds, tail level in dB


def scene():
    """Box sounds with a short carpeted-room tail of decaying, dulled noise, over the hum."""
    box = rubbing() + knocks() + cracks() + rings()
    t = np.arange(SR // 2) / SR
    decay = np.exp(-np.log(1000) * t / ROOM_T60_S)
    tail = rng.standard_normal(len(t)) * decay * (t > .004)
    tail = signal.lfilter([.5], [1, -.5], tail)  # soft carpet dulls the treble
    wet = signal.fftconvolve(box, tail / np.sqrt(np.sum(tail ** 2)))[:N]
    return (box + undb(ROOM_DB) * wet + hum())[None]


TOP_HZ = 15800  # upper limit of the phone


def record(dry):
    """The phone cuts the deepest bass and the top."""
    dry = signal.sosfilt(signal.butter(3, 42, "high", fs=SR, output="sos"), dry)
    return signal.sosfilt(signal.ellip(10, .2, 60, TOP_HZ, fs=SR, output="sos"), dry)


dry = scene()
out = record(dry)
digitize_waveform(out)
```